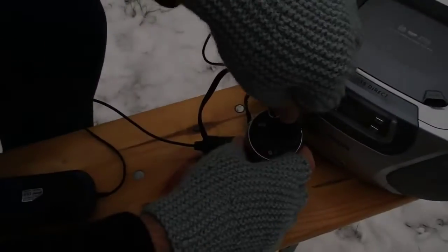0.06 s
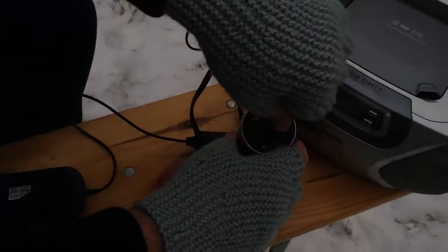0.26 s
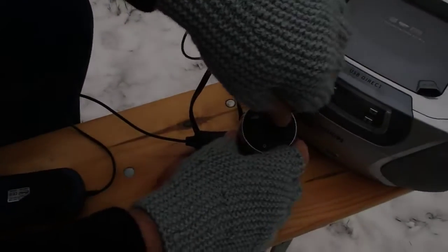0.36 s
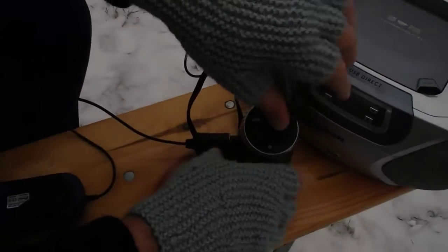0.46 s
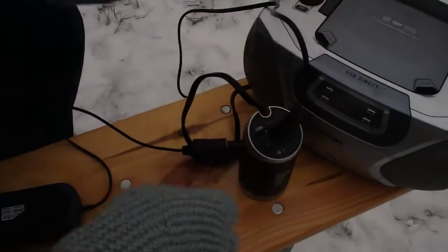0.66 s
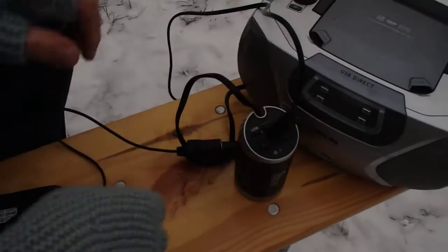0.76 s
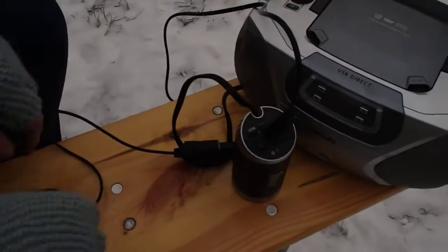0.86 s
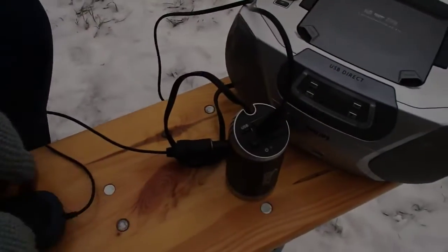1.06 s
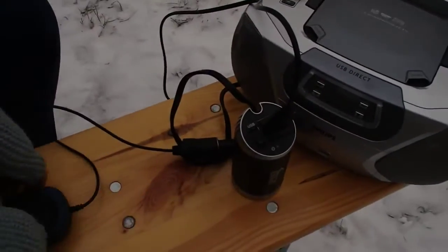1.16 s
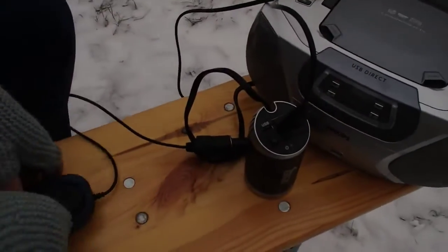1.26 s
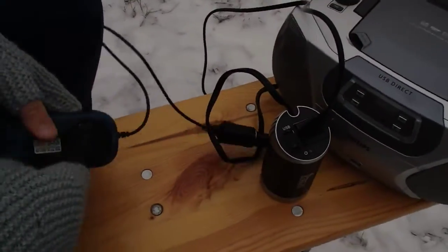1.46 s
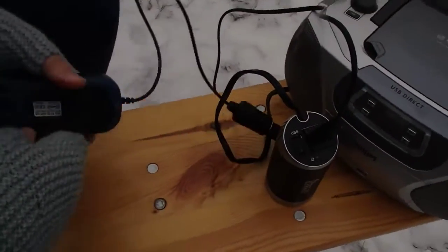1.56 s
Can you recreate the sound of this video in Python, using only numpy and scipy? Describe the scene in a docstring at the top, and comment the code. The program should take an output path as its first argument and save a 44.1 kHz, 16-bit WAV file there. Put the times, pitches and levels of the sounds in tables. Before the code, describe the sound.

A plug scrapes, clicks and snaps loudly into a plastic power adapter close by, knocking a wooden bench. Then a small plastic device is picked up with sharp clicks and rubs, over faint ticking static from a portable stereo.

```python
"""Scrapes, clicks and a loud snap: a plug is pushed into a plastic power adapter, knocking a wooden bench.
The adapter is let go, and a small plastic device on a cable is picked up with sharp clicks and rubs.
Each touch makes the plastic shell, the metal contacts or the wood ring briefly.
Behind it a portable stereo gives faint static with a regular interference tick;
this background sinks after the loudest snap and comes back."""
import sys
import numpy as np
from scipy import signal
from scipy.fft import rfft, irfft
from scipy.io import wavfile

SR = 44100
rng = np.random.default_rng(int(sys.argv[2]) if len(sys.argv) > 2 else 0)


def master(y):
    """Save y as 16-bit WAV."""
    cut = np.clip(np.atleast_2d(y).T, -1, 1)
    pcm = np.round(cut * 32767)  # scale
    wavfile.write(sys.argv[1], SR, pcm.astype(np.int16))


N = 70560
T = np.arange(int(.25 * SR)) / SR   # the time axis of one short sound, in seconds
STATIC_TOP_HZ = 3880
# In the tables, "fade" is the time to drop by 60 dB and "stretch" multiplies that time.
# More "tilt" is brighter, "pan" above 0 is to the left, and "lag" delays the right ear.


# Sharp clicks: (time [s], shell level [dB], shell tilt [dB/octave], metal level [dB],
# crack level [dB], stretch [x], pan [dB], lag [ms])
CLICK_HITS = [(0.0279, -24, -3, -22.5, -52, 1.2, 9, 0.053), (0.228, -24.5, 5, -20, -54, 2.1, 16, 0.024),
              (.2395, -18.5, 22, -27, -48, 1.8, 4, 0.018), (0.2466, -15.5, 27, -25, -43, 1.1, 12, 0.068),
              (0.248, -8, 19.5, -12.5, -27.5, 1.37, 28, 0.056),
              (0.2526, -11.5, 9, -29, -44, 0.27, 6, 0.025), (0.3018, -26, -19, -41, -41, 0.41, 13, 0.039),
              (0.3054, -18, 0.5, -16, -30, 1.1, 10, 0.031), (.307, -5, 26, -2.5, -20.5, 1.13, 14.5, 0.023),
              (1.0465, -13, 7.5, -19.5, -37, 0.8, 12, 0.048), (1.0543, -19, 51, -12, -56, 1.06, -2, 0),
              (1.0852, -39, 9, -36, -33, 0.14, 0, -0.034), (1.0837, -46, -15, -40, -36, 0.34, 4, 0.033),
              (1.0868, -25, -16, -18.5, -38, .3, 5, 0.058),
              (1.0886, -12.5, -2, -12.5, -40, 0.56, -7, -0.042),
              (1.4523, -21, 5, -28, -29.5, 1.1, 31, -0.06), (1.4967, -21.5, 8, -40, -54, 2.4, 3, -0.058)]
def clicks():
    """Hard hits ring the plastic shell and the metal contacts, with a short crack on top."""
    out = np.zeros((2, N))
    for s, shell_db, tilt_db, metal_db, crack_db, stretch, pan_db, lag_ms in CLICK_HITS:
        force = touch(chatter=.037)
        burst = rng.standard_normal(len(T)) * fade(.022 * stretch)
        crack = cut_treble(cut_bass(burst, hz=4000), hz=11900)
        add(out, s, from_db(shell_db) * drive(force, shell(tilt_db, stretch)), 0, lag_ms)
        add(out, s, from_db(metal_db) * drive(force, contacts(stretch)), pan_db, lag_ms)
        add(out, s, from_db(crack_db) * crack, pan_db, lag_ms)
    return out


# The shell's natural tones: (pitch [Hz], relative level [dB], fade [s])
SHELL_TONES = [(815, -13, 0.0047), (932, -4.5, 0.008), (1200, -6.5, 0.0059), (1557, -6.5, 0.017),
               (2191, -3.5, 0.014), (2503, 2, 0.014), (2973, -2, 0.013), (3293, -0.5, 0.015),
               (3458, 2, 0.011), (3520, -47.5, 0.0047)]
def shell(tilt_db, stretch=1):
    """Struck plastic rings very briefly; the microphone dulls it above about 4 kHz."""
    return cut_treble(ringing(SHELL_TONES, tilt_db, stretch), hz=4070)


# The metal's natural tones: (pitch [Hz], relative level [dB], fade [s])
METAL_TONES = [(5180, 14, 0.0053), (5560, -1.5, 0.006), (6170, 3, 0.0082), (6650, 12, 0.0037),
               (7340, -10, 0.013), (8980, 0.5, 0.002), (10120, 5, 0.0036), (11430, -1, .004)]
def contacts(stretch=1):
    """The small metal contacts give a tiny, bright ring."""
    return cut_treble(ringing(METAL_TONES, 0, stretch), hz=10600)


# Knocks on the bench: (time [s], level [dB], tilt [dB/octave], stretch [x], push rise time [ms])
BENCH_HITS = [(.0275, -30.5, 7, 0.89, .1), (.2375, -21, 5, 0.54, 0.22), (.2478, -18.5, 1.5, 1, 0.061),
              (.2995, -11, -15, 0.27, 0.081), (.3038, -6.5, 6.5, 1, 0.11), (.333, -15, -1.5, 1, 0.096),
              (.642, -34.5, 12, 0.33, 0.13), (.654, -24.5, -0.5, 1.0, 0.34), (.866, -31, 8, 0.56, 0.12),
              (1.0883, -6.5, -7, 0.11, 0.12), (1.249, -39.5, -50, 0.89, .3), (1.316, -41, -5, 1.0, 0.27),
              (1.388, -35, -9, 1.0, 0.37), (1.4385, -21, -10, 1, 0.15), (1.453, -30.5, 5, 1.0, .15)]
# The bench's natural tones: (pitch [Hz], relative level [dB], fade [s])
BENCH_TONES = [(146, -11, 0.046), (194, -5, 0.076), (263.6, -3, 0.098), (357, -5.5, 0.11), (495, -1, 0.066),
               (603, 4, 0.043), (860, -7.5, 0.048), (1007, -25, 0.14)]
def knocks():
    """A quick push makes the wooden bench ring; a slower push sounds duller."""
    out = np.zeros((2, N))
    for s, db, tilt_db, stretch, rise_ms in BENCH_HITS:
        push = T * np.exp(-T * 1000 / rise_ms)
        wood = ringing(BENCH_TONES, tilt_db, stretch, far=True)
        add(out, s, from_db(db) * drive(push / push.sum(), wood))
    return out


# Tones that stand out after a hit: (time [s], pitch [Hz], level [dB], fade [s], pan [dB])
LINGERING_TONES = [(.307, 4830, -34.5, 0.2, 19), (.307, 3470, -6.5, 0.02, 1.5), (.305, 252.5, -29, .07, -1),
                   (.334, 387.5, -39.5, 0.28, 0), (.334, 496, -36, 0.21, -5), (.652, 203, -32, 0.14, 0.5),
                   (1.089, 737, -40.5, .16, 3), (1.4385, 206, -29, 0.12, 0.5),
                   (1.4962, 2330, -30, 0.022, 0)]
def lingering():
    """A springy contact, the shell or the bench rings on at a single pitch."""
    out = np.zeros((2, N))
    for s, hz, db, fade_s, pan_db in LINGERING_TONES:
        add(out, s, from_db(db) * np.sin(2 * np.pi * hz * T) * fade(fade_s), pan_db)
    return out


# Plastic and wool rubbing:
# (time [s], length [s], shell level [dB], shell tilt [dB/octave], metal level [dB])
RUB_STROKES = [(0.0262, 0.0031, -24.5, 34, -34), (0.088, 0.0027, -29, -1, -46),
               (.099, 0.011, -32.5, -0.5, -48), (0.229, 0.005, -34.5, -2, -51),
               (0.242, 0.01, -25, -3.5, -55), (0.263, 0.038, -37.5, -4, -49), (.296, 0.018, -25.5, 3, -40),
               (0.512, 0.053, -54.5, -36, -78), (0.625, 0.016, -43.5, -8.5, -71),
               (.642, 0.014, -39, -15, -68), (0.841, 0.046, -46.5, 1, -60), (1.057, 0.018, -45.5, 11, -43),
               (1.082, 0.0055, -31, -36, -27), (1.387, 0.0098, -33.5, 34, -65),
               (1.434, 0.03, -38.5, 8, -50), (1.449, 0.0044, -32.5, 30, -43.5),
               (1.460, 0.028, -41, -2, -54), (1.503, 0.0024, -52, 8, -45)]
def rubs():
    """A rub is a crowd of tiny slips, each ringing the shell and the contacts."""
    slips_per_s, rise_s, release_s = 2500, .0014, .0035
    out = np.zeros((2, N))
    for s, length_s, shell_db, tilt_db, metal_db in RUB_STROKES:
        stroke = np.minimum(T / rise_s, 1) * np.exp(-np.maximum(T - length_s, 0) / release_s)
        slipping = rng.random(len(T)) < slips_per_s / SR
        slips = slipping * rng.standard_normal(len(T)) * stroke
        for body, db, pan_db in ((shell(tilt_db), shell_db, 0), (contacts(), metal_db, 4.5)):
            scrape = drive(slips, body)
            scrape *= np.linalg.norm(stroke) / (np.linalg.norm(scrape) + 1e-12)
            add(out, s, from_db(db) * scrape, pan_db)
    return out


# Light taps: (time [s], relative level [dB], tilt [dB/octave])
LIGHT_TAPS = [(0.0912, -23, -5), (.642, -31.5, -8), (1.315, -30.5, 22), (1.3437, -29.5, 16),
              (1.3915, -27.5, 0)]
def taps():
    """Fingers and cable touch the plastic shell, softly and with a little grit."""
    out = np.zeros((2, N))
    for s, db, tilt_db in LIGHT_TAPS:
        tap = drive(touch(chatter=.21), shell(tilt_db))
        add(out, s, from_db(db) * tap / np.sqrt(2), lag_ms=0)
    return out


def echoes(sound):
    """Things nearby bounce the sound back as a short, dull tail, different in each ear."""
    tail = cut_treble(rng.standard_normal((2, len(T))), hz=3300) * fade(.15)
    tail *= from_db(-22) / np.linalg.norm(tail[0])
    return signal.fftconvolve(cut_bass(sound, hz=655), tail, axes=1)[:, :N]


# The loudspeaker's natural tones: (pitch [Hz], relative level [dB], fade [s])
SPEAKER_TONES = [(664, -14, 0.013), (1470, 0.5, 0.011), (1725, 9, 0.013), (2180, 0.5, 0.013),
                 (2360, 3, 0.031), (3000, -11, 0.024)]
def ticks():
    """Interference jolts the loudspeaker at a steady rate, rising and sinking with the static."""
    first_s, every_s, boost_db = .052, .13355, 14.5
    out = np.zeros((2, N))
    for s in np.arange(first_s, N / SR, every_s):
        tick = cut_treble(drive(touch(chatter=.15), ringing(SPEAKER_TONES)), STATIC_TOP_HZ)
        static_db, _ = background_levels(s)
        add(out, s, from_db(static_db + boost_db) * tick)
    return out


# Tone colour of the static: (frequency [Hz], relative level [dB])
STATIC_COLOUR = [(25, 12), (65, 7.5), (110, -10), (250, 5), (450, -0.5), (1000, -6.5), (1800, 0),
                 (2600, 2.5), (3400, 6.5), (3900, 3)]
# Tone colour of the thin hiss: (frequency [Hz], relative level [dB])
HISS_COLOUR = [(1000, 6), (4200, -1.5), (5500, 2), (8000, -2), (12000, -1.5), (16000, -2)]
def static_and_hiss():
    """The loudspeaker gives soft static; a thin hiss reaches higher into the treble."""
    static_db, hiss_db = background_levels(np.arange(N) / SR)
    static = from_db(static_db) * noise(STATIC_COLOUR, STATIC_TOP_HZ)
    hiss = from_db(hiss_db) * noise(HISS_COLOUR, SR / 2)
    return static + hiss


# Loudness of the background: (time [s], static level [dB], hiss level [dB])
BACKGROUND_LEVELS = [(0, -47, -47.5), (.23, -44.5, -47.5), (.32, -54, -48), (.45, -53.5, -52.5),
                     (.6, -53, -49), (.79, -46.5, -47.5), (1.04, -48, -47), (1.3, -45, -47.5),
                     (1.6, -44, -46.5)]
def background_levels(s):
    """The static and hiss levels at time s: they sink, then come back."""
    times, static_db, hiss_db = np.transpose(BACKGROUND_LEVELS)
    return np.interp(s, times, static_db), np.interp(s, times, hiss_db)


# How alike the noise is in both ears: (frequency [Hz], likeness [0 to 1])
EAR_LIKENESS = [(50, 0.87), (300, 0.95), (1000, 0.82), (2000, 0.89), (3500, 0.1), (6000, 0.12),
                (15000, 0.016)]
def noise(colour, top_hz):
    """Steady stereo noise, centred in the bass and spread wide in the treble."""
    hz = np.fft.rfftfreq(N, 1 / SR)
    alike = read_curve(EAR_LIKENESS, hz)
    shared, opposite = rfft(rng.standard_normal((2, N)))
    ears = np.sqrt(1 + alike) * shared + np.sqrt(1 - alike) * opposite * [[1], [-1]]
    steep_cut = 1 / np.sqrt(1 + (hz / top_hz) ** 50)
    sound = irfft(from_db(read_curve(colour, hz)) * steep_cut * ears, N)
    return sound / sound.std()


def ringing(tones, tilt_db=0, stretch=1, far=False):
    """A struck object sounds all its natural tones at once, each fading at its own rate."""
    hz, db, fades = np.transpose(tones)
    gains = from_db(db + tilt_db * np.log2(hz))
    if far:   # away from the hit, every other tone is flipped, so the sound builds more slowly
        gains[1::2] *= -1
    gains /= np.linalg.norm(gains)
    return sum(gain * np.cos(2 * np.pi * pitch * T) * fade(fade_s * stretch)
               for pitch, gain, fade_s in zip(hz, gains, fades))


def touch(chatter):
    """The force of one hit, followed by a brief rattle of the surfaces."""
    return (T == 0) + chatter * rng.standard_normal(len(T)) * fade(.019)


def drive(force, ring):
    """Every bit of the force starts its own copy of the object's ring."""
    return signal.fftconvolve(force, ring)[:len(T)]


def fade(seconds):
    """A smooth fall of 60 dB in the given time."""
    return from_db(-60 * T / seconds)


def from_db(db):
    """Turn decibels into a multiplier."""
    return 10 ** (np.asarray(db) / 20)


def read_curve(points, hz):
    """Read between a table's points, with frequency spaced in octaves."""
    frequencies, values = np.transpose(points)
    return np.interp(np.log(hz + 1), np.log(frequencies), values)


def cut_bass(sound, hz):
    """Thin the sound by weakening everything below hz."""
    return signal.sosfilt(signal.butter(2, hz, "high", fs=SR, output="sos"), sound)


def cut_treble(sound, hz):
    """Dull the sound by weakening everything above hz."""
    return signal.sosfilt(signal.butter(4, hz, fs=SR, output="sos"), sound)


def add(out, s, sound, pan_db=0, lag_ms=.039):
    """Mix a sound in at time s, placed by a level gap and a tiny delay between the ears."""
    start, padded = int(s * SR), 2 * len(T)
    gains = from_db([[pan_db / 2], [-pan_db / 2]])
    gains /= np.sqrt(np.mean(gains ** 2))
    delay = np.exp(-2j * np.pi * np.fft.rfftfreq(padded, 1 / SR) * lag_ms / 1000)
    right = irfft(rfft(sound, padded) * delay)[:len(T)]
    out[:, start:start + len(T)] += (gains * [sound, right])[:, :N - start]


def scene():
    """The handling sounds and their echoes, in front of the ticks, static and hiss."""
    handling = clicks() + taps() + knocks() + rubs() + lingering()
    microphone_dip = signal.iirnotch(4284, Q=9.2, fs=SR)   # weakens a narrow band at 4284 Hz
    handling = signal.lfilter(*microphone_dip, handling)
    return handling + echoes(handling) + ticks() + static_and_hiss()


def record(dry):
    """Flatten the loudest peaks, then cut the deep bass and the highest treble."""
    flattened = dry / (1 + dry ** 8) ** .125
    top_cut = signal.ellip(10, .1, 70, 15900, fs=SR, output="sos")
    return signal.sosfilt(top_cut, cut_bass(flattened, hz=104))


dry = scene()
out = record(dry)
master(out)
```